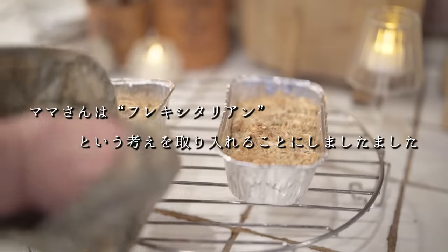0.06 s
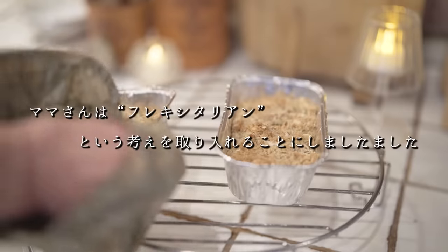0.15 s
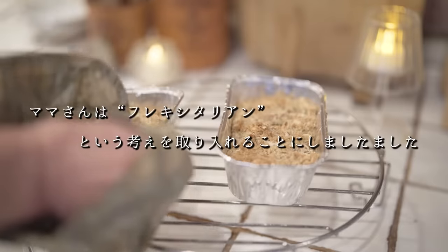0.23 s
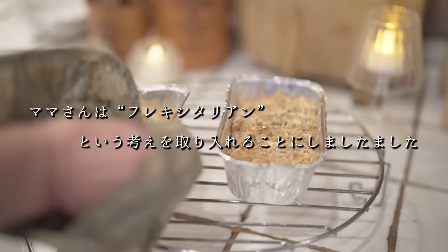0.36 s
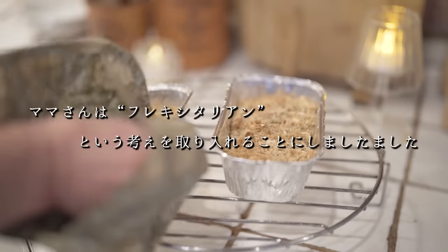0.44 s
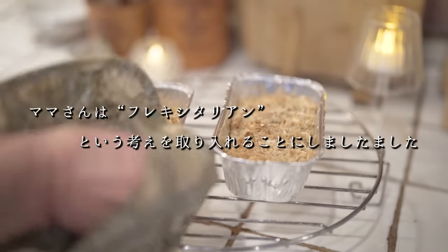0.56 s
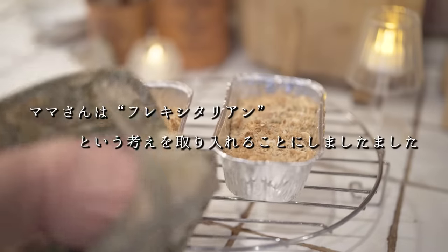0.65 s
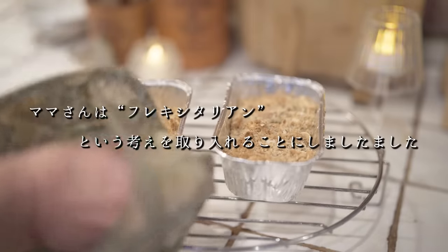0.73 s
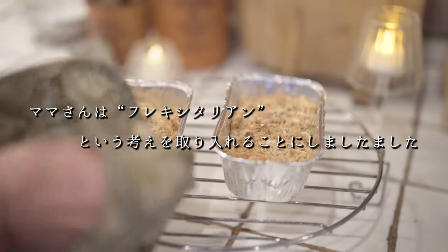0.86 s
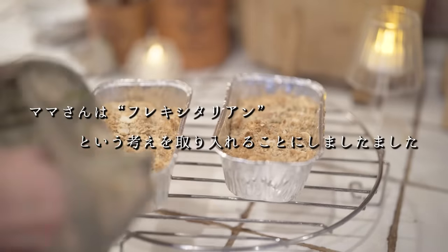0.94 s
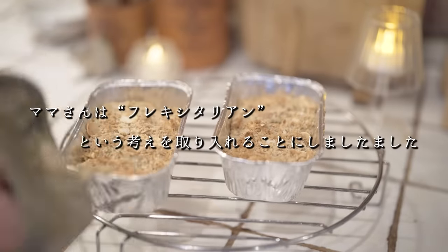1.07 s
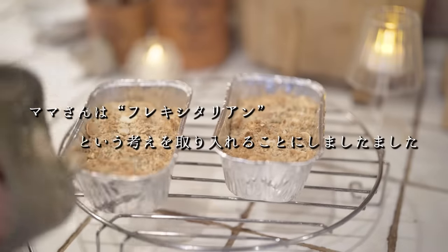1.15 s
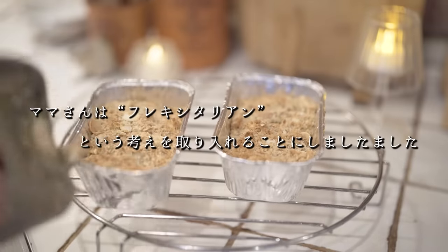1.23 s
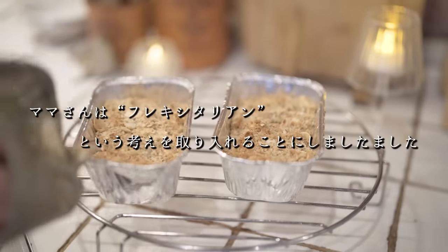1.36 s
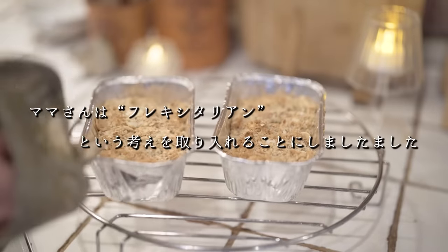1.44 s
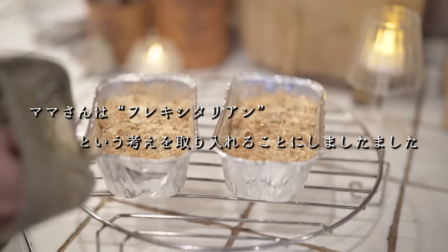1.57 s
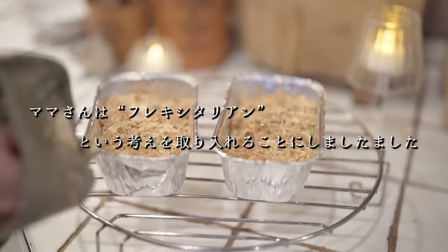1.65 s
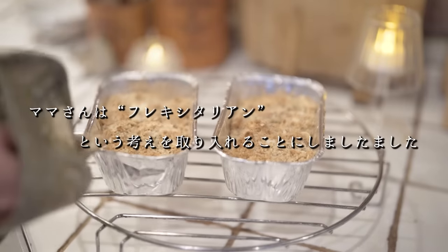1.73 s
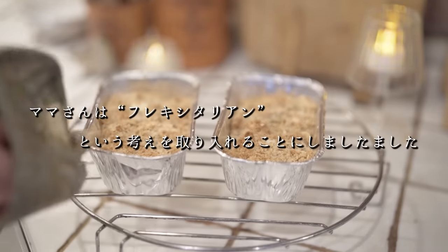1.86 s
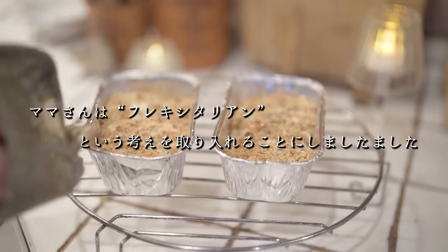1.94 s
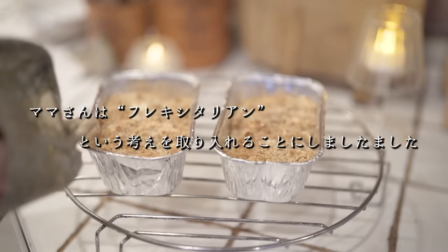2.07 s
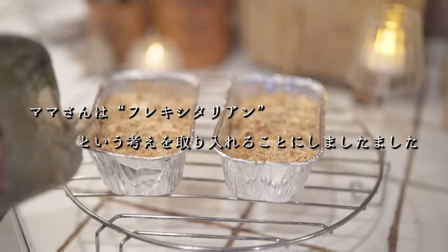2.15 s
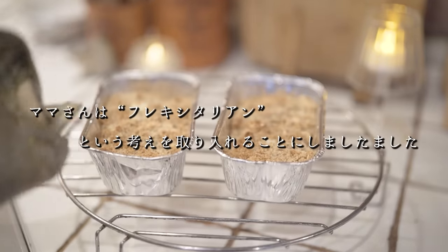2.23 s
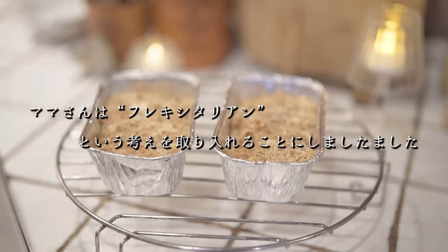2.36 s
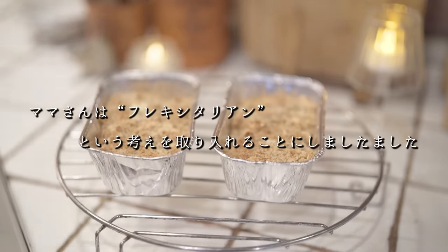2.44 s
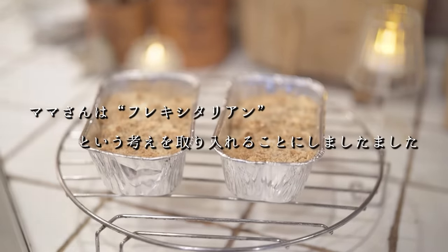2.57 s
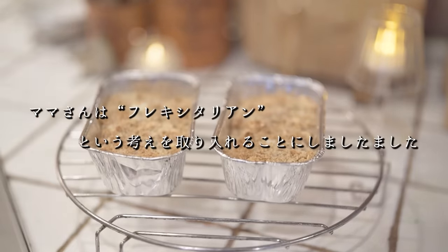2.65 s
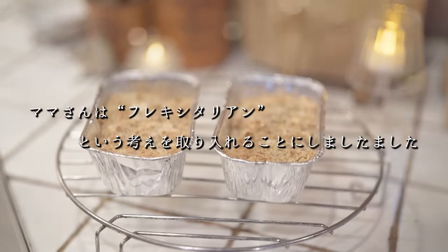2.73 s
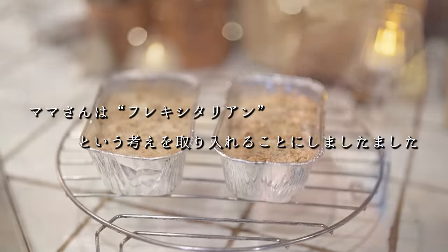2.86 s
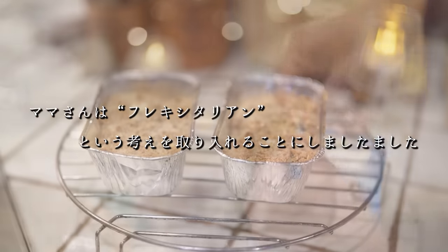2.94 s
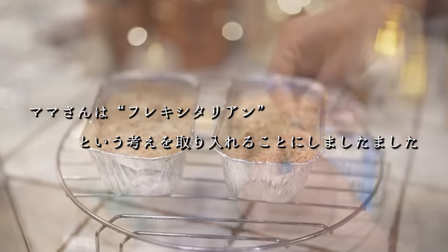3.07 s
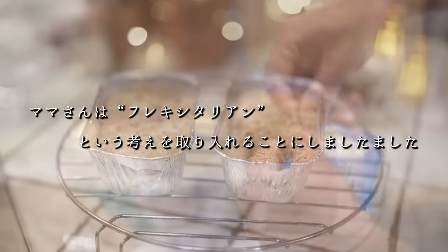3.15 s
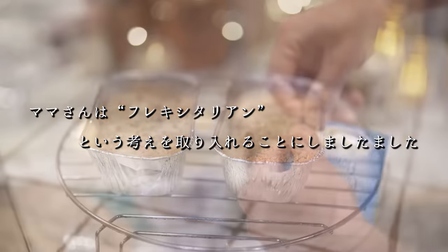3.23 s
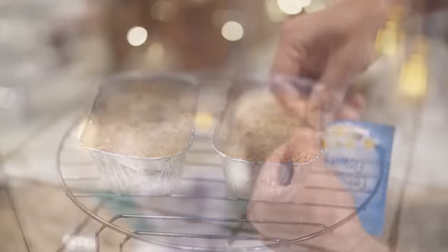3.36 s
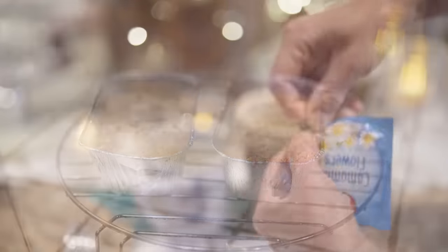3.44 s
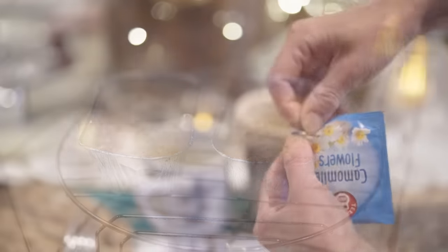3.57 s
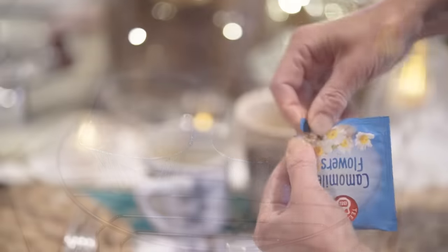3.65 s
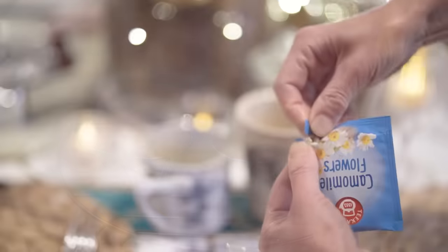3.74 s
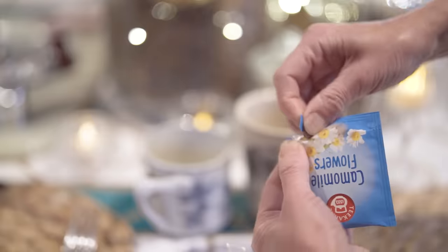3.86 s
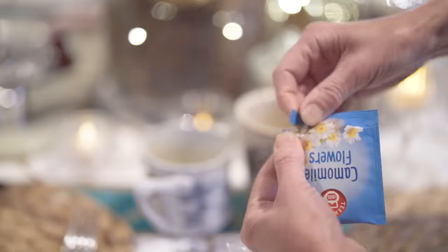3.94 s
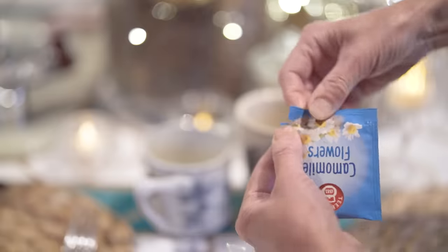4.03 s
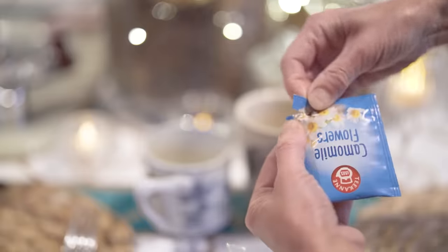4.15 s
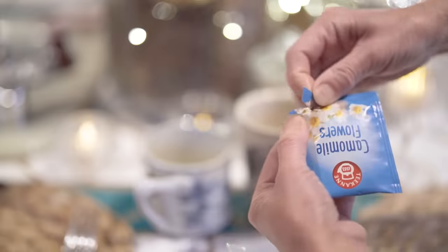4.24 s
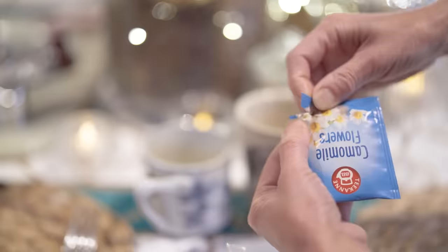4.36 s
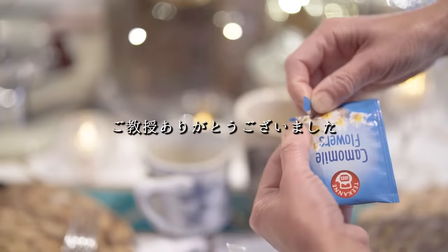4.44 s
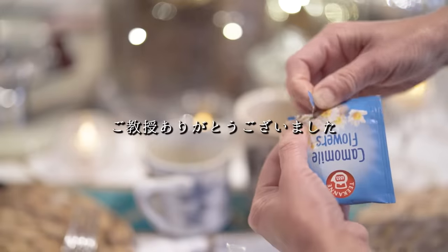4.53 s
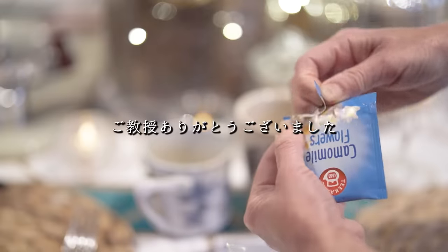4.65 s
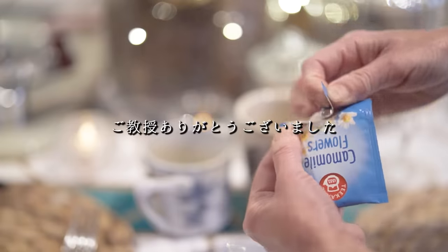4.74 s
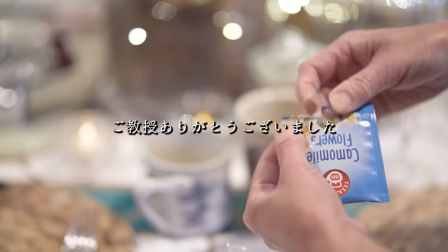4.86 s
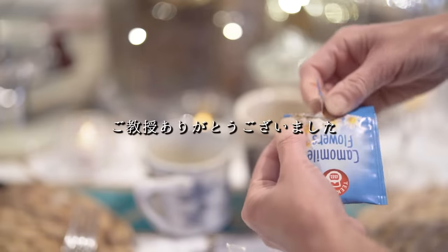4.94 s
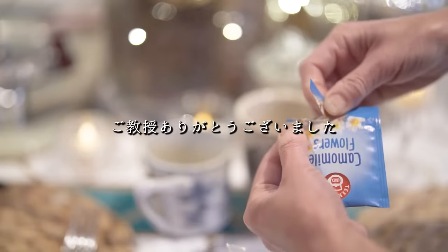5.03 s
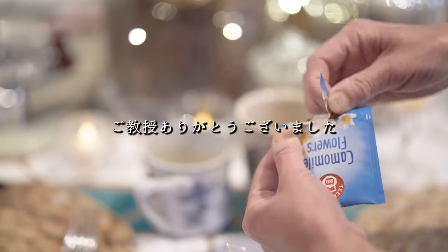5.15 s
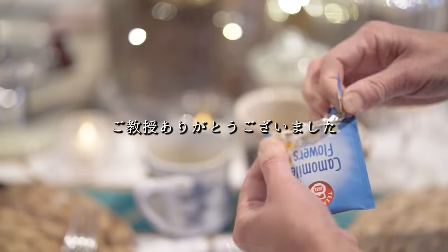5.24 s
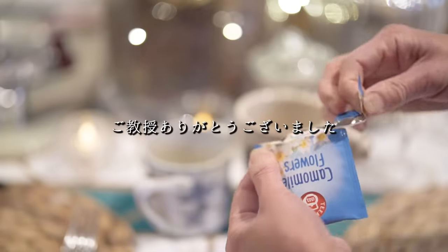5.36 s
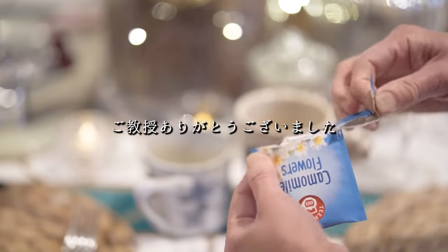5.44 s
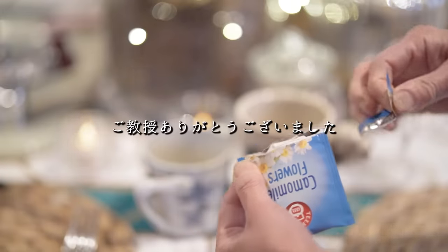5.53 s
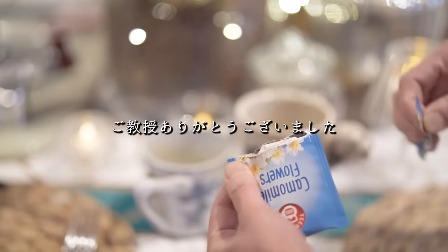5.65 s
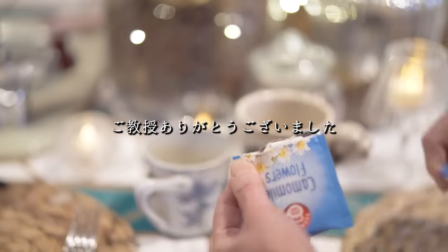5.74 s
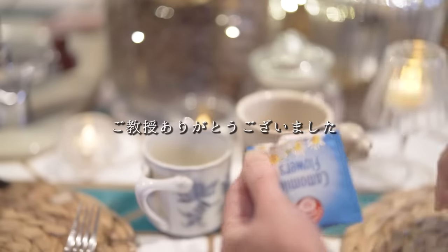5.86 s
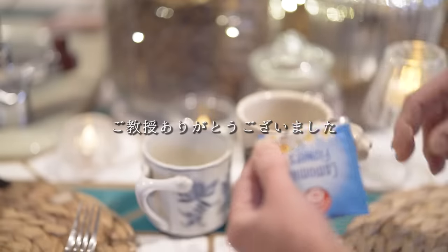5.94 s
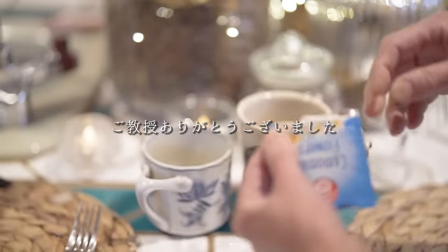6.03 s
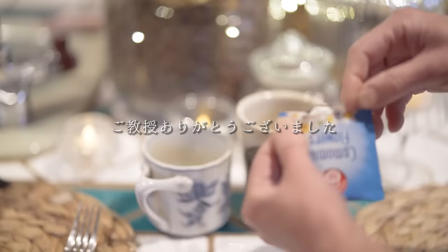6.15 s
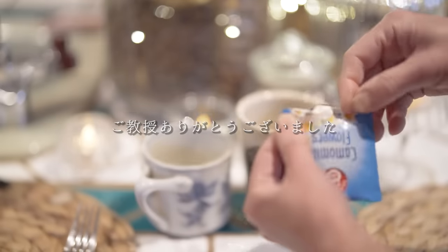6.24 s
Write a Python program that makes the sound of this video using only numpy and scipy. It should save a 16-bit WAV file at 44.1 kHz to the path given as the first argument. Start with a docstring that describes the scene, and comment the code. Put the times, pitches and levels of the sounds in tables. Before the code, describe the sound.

In a quiet kitchen, metal rack clinks give way to a thud and close, crisp crinkling as fingers rip open a tea sachet.

```python
"""Foil tins knock and slide on a wire rack in a quiet kitchen, close to the microphone: noise bursts and ringing modes.
Two dull knocks follow from further off, and bumps set the microphone stand swaying and thudding at low pitch.
Then fingers flex a paper tea sachet until it snaps, and tear its top off in short rips that swell, hold and
die away: dense fibre breaks, ringing facets and snapping creases, answered by the small room.
A faint room tone of coloured noise lies under it all."""
import sys
import numpy as np
from scipy import signal
from scipy.fft import rfft, irfft, next_fast_len
from scipy.io import wavfile

SR = 44100
rng = np.random.default_rng(int(sys.argv[2]) if len(sys.argv) > 2 else 0)


def materialize(psi):
    """Save the field psi as 16-bit PCM at rate SR to the path in sys.argv[1].

    A 1-D psi becomes a single channel; in a 2-D psi each row is a channel.
    """
    bounded = np.clip(np.atleast_2d(psi).T, -1, 1)
    quanta = np.round(bounded * 32767).astype(np.int16)
    wavfile.write(sys.argv[1], SR, quanta)


N = 277642
T = np.arange(N) / SR


def amp(db):
    """Decibels to gain."""
    return 10 ** (np.asarray(db) / 20)


def unit(x):
    """Scale to rms 1."""
    return x / np.sqrt(np.mean(x ** 2))


def peak(x):
    """Scale to peak 1."""
    return x / np.max(np.abs(x))


def fade(t, t60):
    """Exponential decay, 60 dB in t60 seconds."""
    return np.exp(-np.log(1000) * t / t60)


def noise(t):
    """White noise as long as the time axis t."""
    return rng.standard_normal(len(t))


def add(out, s, x):
    """Mix a sound in at time s; a start before zero loses its head."""
    start = int(round(s * SR))
    x, start = x[max(-start, 0):], max(start, 0)
    out[start:start + len(x)] += x[:N - start]


def cut(x, hz, kind, order=2):
    """Butterworth filter."""
    return signal.sosfilt(signal.butter(order, np.minimum(hz, SR / 2 - 1), kind, fs=SR, output="sos"), x)


def colour(x, points):
    """Causal filter with the given (frequency [Hz], level [dB]) shape, built from the cepstrum."""
    size = 2048
    hz, db = np.transpose(points)
    bins_hz = np.arange(size // 2 + 1) * SR / size
    gain = amp(np.interp(np.log(bins_hz + 1), np.log(hz), db))
    # folding the cepstrum onto positive time makes the filter minimum phase
    cepstrum = irfft(np.log(gain))
    cepstrum[1:size // 2] *= 2
    cepstrum[size // 2 + 1:] = 0
    return signal.fftconvolve(x, irfft(np.exp(rfft(cepstrum))))[:len(x)]


def wash(t, low_t60, high_t60):
    """Countless overlapping modes: noise whose decay goes band by band from low_t60 to high_t60."""
    edges = [0, 400, 800, 1600, 3200, 6400, 10000, SR]
    spectrum = rfft(noise(t))
    hz = np.arange(len(t) // 2 + 1) * SR / len(t)
    decays = np.geomspace(low_t60, high_t60, len(edges) - 1)
    out = np.zeros(len(t))
    for lo, hi, t60 in zip(edges, edges[1:], decays):
        out += irfft(spectrum * ((hz >= lo) & (hz < hi)), len(t)) * fade(t, t60)
    return out


def ring(t, modes, detune=0):
    """Decaying modes in random phase; detune is the random relative spread of their pitch."""
    out = np.zeros(len(t))
    for hz, db, t60 in modes:
        mode_hz = hz * (1 + detune * rng.standard_normal())
        out += amp(db) * np.sin(2 * np.pi * (mode_hz * t + rng.random())) * fade(t, t60)
    return out


def strokes(rows, t60s):
    """Hand movements swell, hold and die away: joint level in dB, then each colour led by the loudest movement."""
    power = []
    for (s, swell, hold, db, *_), t60 in zip(rows, t60s):
        rise = np.clip((T - s) / swell, 0, 1)
        fall = fade(np.maximum(T - s - swell - hold, 0), t60)
        power.append((amp(db) * rise * fall) ** 2)
    power = np.array(power)
    total = np.sum(power, axis=0) + 1e-12
    return [10 * np.log10(total)] + [column @ power / total for column in np.transpose(rows)[4:]]


def fibres(rate_hz, spread_db, cluster_db, cluster_hz):
    """Tiny breaks of very unequal size, in bunches, as friction or a tear sticks and runs."""
    breaks = rng.random(N) < rate_hz / SR
    size = amp(spread_db * np.minimum(rng.exponential(size=N), 4)) * rng.choice([-1, 1], N)
    bunch = np.interp(T * cluster_hz, np.arange(N), np.clip(rng.standard_normal(N), -2, 2))
    return unit(breaks * size * amp(cluster_db * bunch))


def bend(x, body_db=0, treble_db=0, depth_db=4.0, rate_hz=30):
    """A sheet's resonances come and go as it changes shape: each third octave swells alone, both ends tilt."""
    centres = np.geomspace(500, 14000, 15)
    edges = np.concatenate([[0], np.sqrt(centres[1:] * centres[:-1]), [SR]])
    spectrum = rfft(x, 2 * next_fast_len(N // 2 + 1))
    hz, out = np.linspace(0, SR / 2, len(spectrum)), np.zeros(N)
    for centre, lo, hi in zip(centres, edges, edges[1:]):
        points = np.clip(rng.standard_normal(N // 100), -2, 2)
        swell = np.interp(T * rate_hz, np.arange(N // 100), points)
        body = body_db * np.interp(centre, [1400, 2500], [1, 0])
        treble = treble_db * np.interp(centre, [4000, 11000], [0, 1])
        band = irfft(spectrum * ((hz >= lo) & (hz < hi)))[:N]
        out += band * amp(body + treble + depth_db * swell)
    return out


def room_tone():
    """Faint air of the kitchen: coloured noise that varies a little and sinks quickly as the sachet starts."""
    # spectrum: (frequency [Hz], relative level per hertz [dB])
    air = [(20, 19.5), (45, 3.5), (70, 2), (150, -9.5), (300, -8), (600, -12), (1200, -17.5), (2500, -22.5),
           (6000, -27), (9000, -30), (15000, -37)]
    # rms level: (time [s], level [dB])
    air_level = [(0, -45), (1.1, -44), (2.15, -47.5), (2.5, -42.5), (3.22, -45.5), (3.3, -48), (6.3, -51)]
    level_db = np.interp(T, *np.transpose(air_level))
    return amp(level_db) * unit(colour(noise(T), air))


def room(x, low_t60, high_t60, gap=0.0063):
    """The kitchen's answer: a unit-energy response of a short silence, then dense reflections fading in."""
    # colour of the reflections: (frequency [Hz], level [dB])
    walls = [(150, -18.5), (600, 0.5), (1500, -1), (3500, 0), (8000, 4.5), (11000, -2.5), (16000, 3)]
    t = T[:SR // 2]
    response = colour(wash(t, low_t60, high_t60), walls) * np.clip((t - gap / 2) / gap, 0, 1)
    return signal.fftconvolve(x, response / np.sqrt(np.sum(response ** 2)))[:N]


def stand(sway_hz=15.0, sway_t60=1.174, thud_t60=0.25, rumble_t60=0.22):
    """Each bump gives a deep thud and a short rumble, and leaves the stand swaying below hearing."""
    # bumps on the microphone stand:
    # (time [s], sway level [dB], thud level [dB], thud pitch [Hz], rumble peak level [dB])
    bumps = [(-.06, -22.5, -44.5, 24, -58), (1.363, -15, -21, 67.5, -39), (1.382, -4, -5.5, 32.5, -35.5),
             (2.637, -4.5, -54, 26, -63), (5.075, -9, -31, 32, -45), (5.128, -6.5, -31, 41.7, -32.5),
             (5.321, -22.5, -33, 43.7, -37.5), (5.431, -13.5, -6, 35.2, -39)]
    out, t = np.zeros(N), T[:2 * SR]
    for s, sway_db, thud_db, hz, rumble_db in bumps:
        # sway and thud build up gradually, then decay
        sway = np.sin(2 * np.pi * sway_hz * t) * fade(t, sway_t60) * (1 - fade(t, 0.33))
        thud = np.sin(2 * np.pi * hz * t) * fade(t, thud_t60) * (1 - fade(t, 0.059))
        rumble = peak(cut(noise(t) * fade(t, rumble_t60), [35, 125], "band", order=3))
        add(out, s, amp(sway_db) * sway + amp(thud_db) * thud + amp(rumble_db) * rumble)
    return out


def knocks():
    """Dull wooden knocks further off: a diffuse decaying wash plus panel modes, each cut off after its length."""
    # (time [s], peak level [dB], low cut [Hz], high cut [Hz], ring against wash [dB], time until cut off [s])
    blows = [(2.382, -13, 1080, 5980, -9, 0.99), (3.0585, -6, 174, 2550, -0.5, .191)]
    # modes of the knocked panel: (frequency [Hz], relative level [dB], t60 [s])
    panel = [(263, -8, 1.1), (311, -7, .85), (390, -7, .5), (429, -7, .55), (490, 0, .5), (571, 4, .42),
             (1141, -2, .29), (1211, -8, .27), (1556, -9, .3)]
    # colour of the wash: (frequency [Hz], level [dB])
    wood = [(80, -25), (160, 3.5), (300, 3), (580, 1), (850, 1.5), (1250, -2.5), (1800, -3.5), (2700, -4),
            (4500, -11), (7000, -17.5), (10000, -27), (14000, -44)]
    out, t = np.zeros(N), T[:SR]
    for s, db, low_hz, bright_hz, ring_db, length in blows:
        body = cut(colour(wash(t, 0.75, 0.11), wood), low_hz, "high", order=1)
        cutoff = np.clip((length - t) / 0.0014, 0, 1)
        blow = (peak(body) + amp(ring_db) * peak(ring(t, panel))) * cutoff
        add(out, s, amp(db) * peak(cut(blow, bright_hz, "low")))
    return out


def clanks(modes):
    """Foil tins knock on the wires: a short wash from the tin's body, and wire modes slightly retuned each time."""
    # (time [s], peak level [dB], low cut [Hz], high cut [Hz], ring against body [dB])
    blows = [(0.2298, -17, 380, 2700, -35), (.2950, -35, 600, 3975, -13), (0.3914, -20.5, 380, 1480, -11),
             (0.4551, -10, 250, 1800, 0.5), (0.4777, -4.5, 108, 7020, -2), (.4895, -20.5, 130, 2880, 3),
             (.5035, -12, 200, 4130, 5.5), (0.5296, -12.5, 150, 4500, -5.5), (.5668, -19, 250, 1620, 1.5),
             (1.2963, -26.5, 500, 1510, -21)]
    # colour of a foil tin's body: (frequency [Hz], level [dB])
    tin = [(100, -12), (250, -5.5), (450, -1.5), (750, -3.5), (1020, 4.5), (1500, -6.5), (2500, -11),
           (5000, -16.5), (12000, -11)]
    out, t = np.zeros(N), T[:SR]
    for s, db, low_hz, bright_hz, ring_db in blows:
        body = peak(colour(wash(t, 0.14, 0.039), tin))
        blow = body + amp(ring_db) * peak(ring(t, modes, detune=.007))
        add(out, s, amp(db) * peak(cut(cut(blow, bright_hz, "low"), low_hz, "high", order=3)))
    return out


def ticks():
    """Light ticks and taps: short decaying bursts of narrow-band noise."""
    # (time [s], peak level [dB], pitch [Hz])
    taps = [(.004, -34.5, 5450), (0.832, -38, 5350), (1.2975, -17.5, 1050), (1.9280, -26.5, 3980),
            (1.9290, -28, 2015), (2.3325, -31, 820), (2.3340, -36, 527), (2.3450, -26, 770)]
    out, t = np.zeros(N), T[:SR]
    for s, db, hz in taps:
        tap = cut(noise(t), [hz / 1.143, hz * 1.115], "band") * fade(t, 0.071)
        add(out, s, amp(db) * peak(tap))
    return out


def sliding(modes, t60=0.12, sing_db=-5):
    """Cloth and foil slide over the rack: grainy friction, a hiss above it, and wires that sing when scraped hard."""
    # (time [s], swell [s], hold [s], level [dB], hiss against slide [dB])
    slides = [(.250, 0.049, 0.1, -53, -22), (.400, 0.08, 0.059, -26.5, -17.5),
              (.550, 0.011, 0.095, -42, -7.5), (.655, 0.022, 0.039, -38, -4.5),
              (1.205, .02, 0.055, -54.5, -9), (1.275, 0.034, 0.07, -41, -16),
              (1.470, 0.038, 0.061, -40, -21), (1.600, 0.02, 0.22, -59.5, -11),
              (1.905, 0.025, .008, -49.5, -2.5)]
    level_db, hiss_db = strokes(slides, [t60] * len(slides))
    grain = fibres(rate_hz=11000, spread_db=4.0, cluster_db=1.0, cluster_hz=199.7)
    slide = unit(cut(cut(bend(grain), [750, 4600], "band", order=3), 1800, "low", order=1))
    hiss = unit(cut(grain, [5000, 11000], "band"))
    # the doubled level lets only a hard scrape set the wires singing
    scrape = grain * amp(2 * level_db - level_db.max())
    wires = ring(T[:SR], modes)
    sing = signal.fftconvolve(scrape, wires / np.sqrt(np.sum(wires ** 2)))[:N]
    return amp(sing_db) * sing + amp(level_db) * (slide + amp(hiss_db) * hiss)


def rack():
    """Tins on the wire rack: knocks that ring the wires and slides between, with light ticks and taps; mixed in
    with these is a soft knock from further off, just before the first distant knock."""
    # wire rack modes: (frequency [Hz], relative level [dB], t60 [s])
    modes = [(560, -15, .35), (640, -14, .35), (765, -16, .3), (863, -15, .4), (1012, -14, .22),
             (1157, -7, .19), (1211, -35, 2.2), (1240, -1, .25), (1281, -2, .22), (1534, -25, .9),
             (2530, -12, .11), (3720, -2, .16), (4490, -17, .12), (5050, -7, .1), (6266, -13, .17),
             (8350, -10, .12)]
    return clanks(modes) + ticks() + sliding(modes)


def pulls():
    """Level, treble and body in dB of the paper as fingers bend and tear it."""
    # fingers bend the sachet:
    # (time [s], hold [s], level [dB], fine fibre treble [dB], sheet body [dB] before a common lift)
    flexes = [(3.284, 0.0173, -46.5, -17, -18), (3.417, .02, -34.5, -2.5, 2), (3.488, .025, -42, 0, 4),
              (3.584, 0.12, -44, -10, -7), (3.688, 0.083, -34.5, -4.5, -15), (3.877, .01, -38, -11.5, -5.5),
              (4.007, .018, -30, -21, -11.5), (4.096, 0.025, -32, -23, -5), (4.164, 0.074, -39, -6.5, 6.5),
              (4.397, 0.02, -38, -10.5, -13.5), (4.803, 0.0072, -32.5, -10.5, -2),
              (4.892, 0.0076, -35.5, -6, -6), (5.001, 0.018, -34.5, -7, -2),
              (5.476, 0.0092, -24, -11, -9.5), (5.727, 0.0085, -58.5, 3, 0.5),
              (5.801, 0.0052, -57.5, 10.5, -11), (5.927, 0.0028, -43.5, -18, -6.5),
              (6.223, 0.017, -38, -3.5, -9)]
    # the tear runs a little further:
    # (time [s], swell [s], hold [s], level [dB], fine fibre treble [dB], sheet body [dB] before that lift)
    rips = [(3.835, 0.033, .045, -34, 1.5, -6), (4.255, 0.031, 0.0062, -23, -2, -12),
            (4.522, 0.06, 0.011, -24, 5.5, -10), (4.598, 0.025, 0.016, -22, 1.5, 2.5),
            (4.650, 0.011, 0.047, -40, 13, -10), (4.730, 0.022, 0.039, -25, 2.5, -5),
            (5.075, 0.012, 0.33, -31, -6, -4), (5.228, 0.044, 0.093, -24.5, 3, -4.5),
            (5.385, 0.0056, 0.1, -31, -0.5, -11), (5.524, 0.0067, 0.016, -25.5, -0.5, -2)]
    flex_attack_s, flex_t60_s, rip_t60_s = 0.016, 0.21, 0.11
    bends = [(s, flex_attack_s, *rest) for s, *rest in flexes]
    return strokes(bends + list(rips), [flex_t60_s] * len(flexes) + [rip_t60_s] * len(rips))


def tearing(level_db, treble_db, body_db):
    """Fibre breaks ring the sheet; a fast tear is bright and grainy, slow flexing is smoother with more body."""
    # colour of the torn sheet: (frequency [Hz], level [dB])
    paper = [(250, -13.5), (480, -3), (850, 10), (1600, 4), (2500, 9), (3400, 9.5), (4500, 4.5), (6200, 3),
             (8000, 11.5), (10000, 1), (13000, 5.5), (16000, -7.5)]
    breaks = fibres(rate_hz=3500, spread_db=4.0, cluster_db=1.5, cluster_hz=294.5)
    grainy = np.clip(amp(treble_db + 7), 0, 1)
    smooth = np.sqrt(1 - grainy ** 2)
    sheet = unit(colour(grainy * breaks + smooth * noise(T), paper))
    body_lift_db = 2.5
    return amp(level_db) * bend(sheet, body_db + body_lift_db, treble_db)


def crinkles(level_db, rate_hz=110, size_db=2, ring_t60=0.0087):
    """The pulled sheet buckles in small facets, each ringing briefly at a pitch of its own."""
    out, t = np.zeros(N), T[:SR // 50]
    for when, pitch in rng.random((int(rate_hz * N / SR), 2)):
        hz = 900 * (9000 / 900) ** np.sqrt(pitch)
        db = level_db[int(when * N)] + size_db
        add(out, when * N / SR, amp(db) * np.sin(2 * np.pi * hz * t) * fade(t, ring_t60))
    return cut(out, 950, "high", order=3)


def snap(hz, crack_db, ring_t60=0.0069, crack_t60=0.0038, flex_db=-3, flex_t60=0.0097):
    """A crease flips: the small panel swings a few times, the paper round it flexes, and the edge cracks."""
    t = T[:SR // 50]
    panel = np.sin(2 * np.pi * hz * t) * fade(t, ring_t60)
    crack_band = [4500, np.clip(3.3 * hz, 8000, 19000)]
    crack = peak(cut(noise(t) * fade(t, crack_t60), crack_band, "band"))
    flex = peak(cut(noise(t) * fade(t, flex_t60), [hz / 2.0, hz * 1.35], "band", order=1))
    return peak(cut(panel + amp(crack_db) * crack + amp(flex_db) * flex, 630, "high", order=3))


def small_snaps(level_db, treble_db, rate_hz=30, size_db=11, spread_db=6, low_hz=2800, high_hz=9000):
    """Lesser creases give way at random, their level following the pull; a brighter tear has sharper cracks."""
    out = np.zeros(N)
    for when, pitch, size in rng.random((int(rate_hz * N / SR), 3)):
        i = int(when * N)
        hz = low_hz * (high_hz / low_hz) ** (pitch * min(amp(treble_db[i]), 1))
        db = level_db[i] + size_db + spread_db * (size - .5)
        add(out, i / SR, amp(db) * snap(hz, treble_db[i]))
    return out


def creases():
    """The sachet's single loud snaps: towards the microphone, and the broad flap its faces send into the room."""
    # (time [s], peak level [dB], panel pitch [Hz], crack against panel [dB])
    snaps = [(3.2982, -24, 3000, 0.5), (3.3135, -1, 3240, -8.5), (3.4217, -4.5, 3340, 3),
             (3.4882, -22.5, 1010, -4), (3.576, -2, 2700, -1.5), (3.6950, 0, 3440, -8),
             (3.7889, -19, 3380, 20), (3.84, -16.5, 11800, -11), (3.9096, -13, 11900, 3),
             (4.0949, -13, 3470, -30), (4.1145, -20, 2690, -25), (4.156, -8.5, 2560, -23),
             (4.1638, 1, 3120, -10), (4.263, -12, 8100, 6), (4.2850, -3.5, 8600, 8),
             (4.2910, 6.5, 6100, 21), (4.5181, -14, 8240, 2), (4.5426, -10, 8700, -7.5),
             (4.6270, -5.5, 3780, -4.5), (4.6358, -3.5, 6550, 1), (4.672, -1.5, 5200, 2.5),
             (4.7150, -9, 8600, 12), (5.0229, -13, 1130, -22.5), (5.084, -18, 6700, -12),
             (5.135, -13, 3580, -21), (5.1679, -7, 3570, 3.5), (5.2128, -9.5, 3350, 0),
             (5.321, -21, 8000, -2), (5.4324, -12, 3600, 11), (5.4888, -10, 3460, 0.5),
             (5.5050, -11.5, 3280, -21), (5.5420, -14, 3170, -14), (5.5501, -10.5, 3180, -15),
             (5.9411, -19, 4400, -9)]
    near, away, t = np.zeros(N), np.zeros(N), T[:SR // 50]
    for s, db, hz, crack_db in snaps:
        click = amp(db) * snap(hz, crack_db)
        flap = cut(signal.unit_impulse(len(t)), [hz / 1.9, hz * 1.54], "band", order=1)
        add(near, s, click)
        # the flap carries the same energy as the click
        add(away, s, unit(flap) * np.sqrt(np.mean(click ** 2)))
    return near, away


def sachet():
    """The paper sachet close by: tearing, crinkles and snaps, with the small room's answer."""
    level_db, treble_db, body_db = pulls()
    snaps, flaps = creases()
    tear = tearing(level_db, treble_db, body_db) + crinkles(level_db) + small_snaps(level_db, treble_db)
    answer = room(amp(-8.5) * flaps + amp(-13) * tear, low_t60=.25, high_t60=0.23)
    return snaps + tear + answer


def scene():
    """Room tone, stand, knocks, rack and sachet, on one channel."""
    tins = rack()
    tins = tins + amp(-6.5) * room(tins, low_t60=0.34, high_t60=0.16)
    return (room_tone() + stand() + knocks() + tins + sachet())[None]


def record(dry):
    """The recorder rounds the tallest peaks towards 0.7 of full scale and cuts the top."""
    top_hz = 16000
    rounded = dry / (1 + (dry / .7) ** 8) ** (1 / 8)
    return signal.sosfilt(signal.ellip(10, .2, 70, top_hz, fs=SR, output="sos"), rounded)


dry = scene()
out = record(dry)
materialize(out)
```